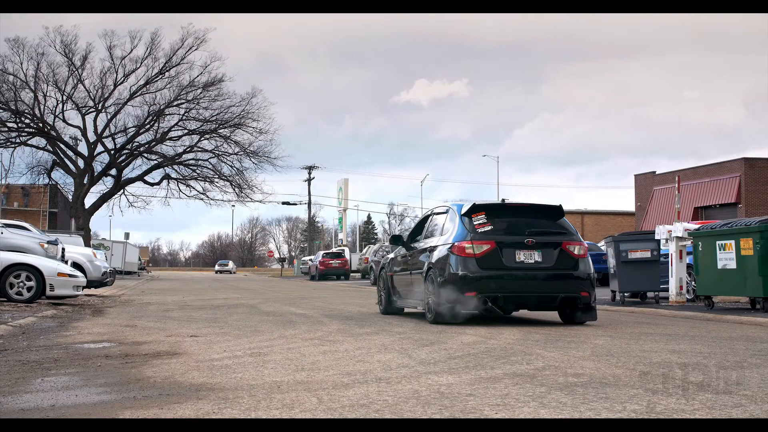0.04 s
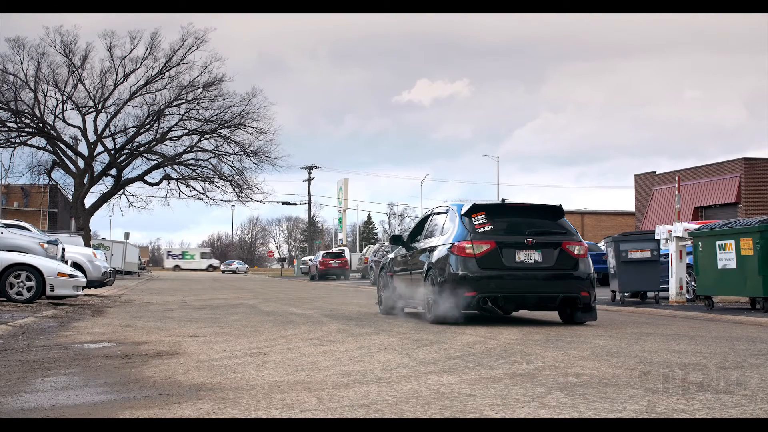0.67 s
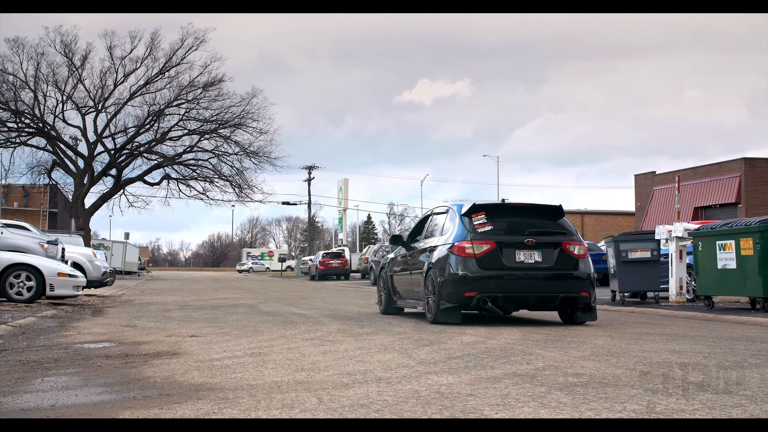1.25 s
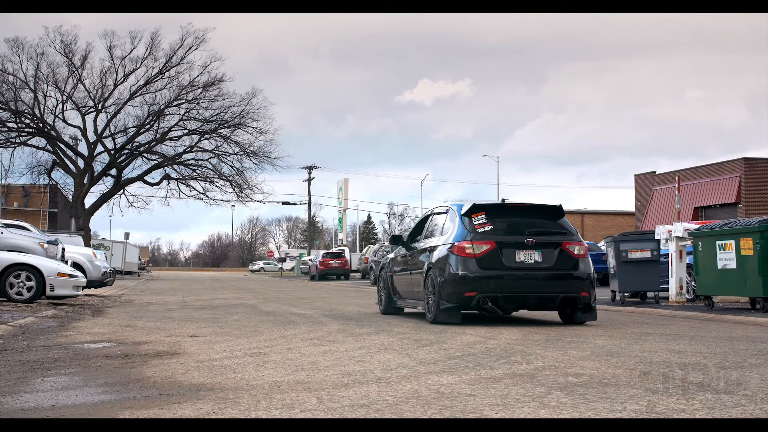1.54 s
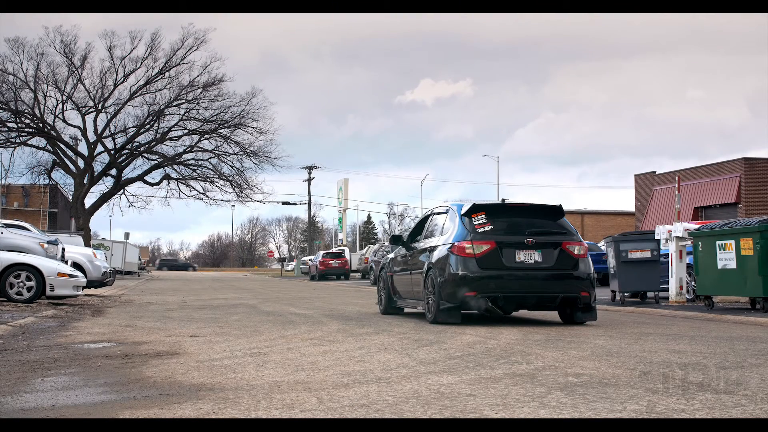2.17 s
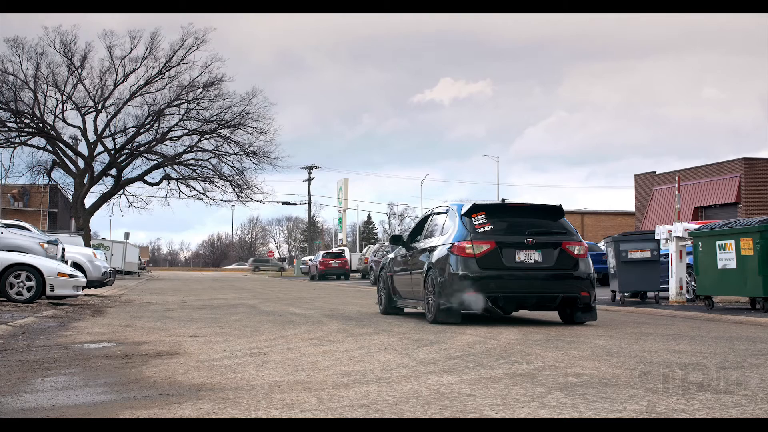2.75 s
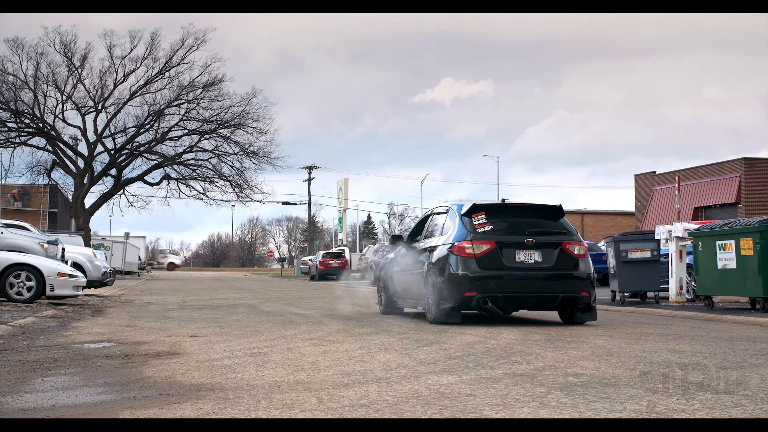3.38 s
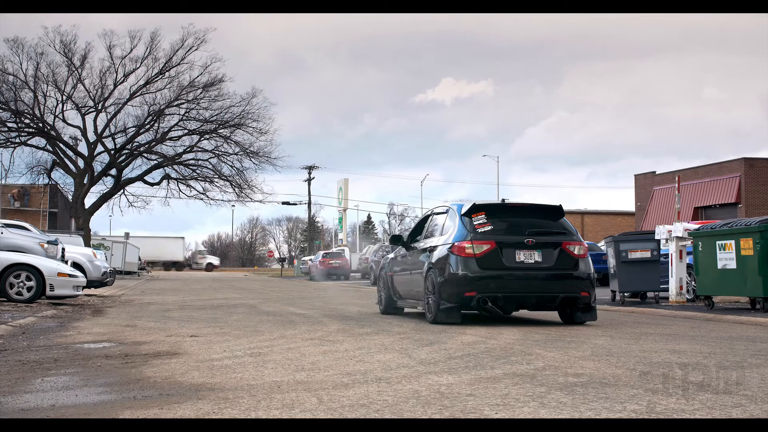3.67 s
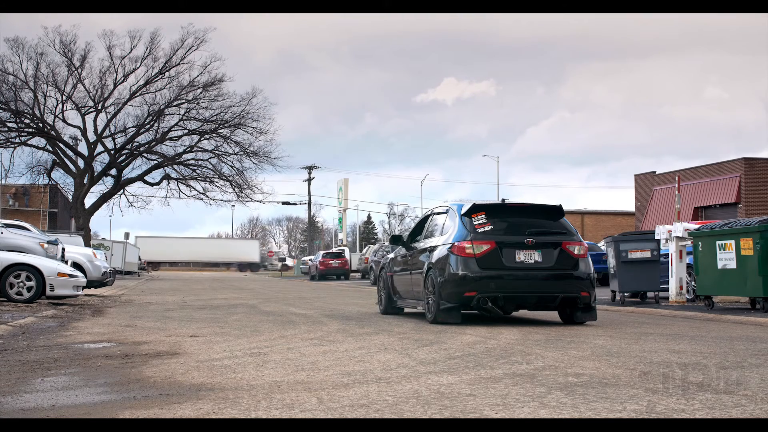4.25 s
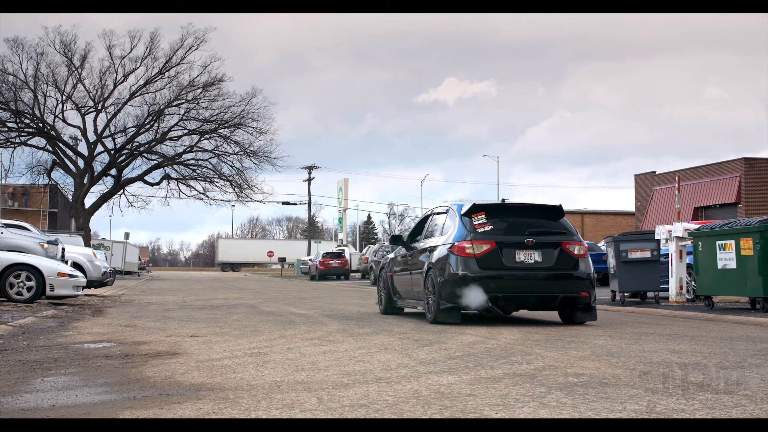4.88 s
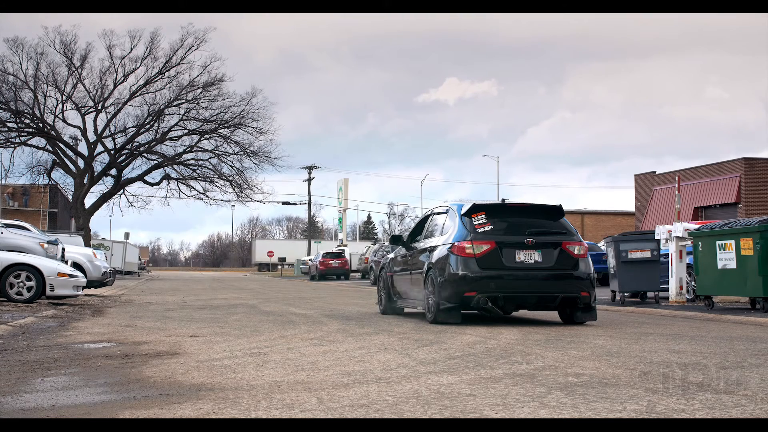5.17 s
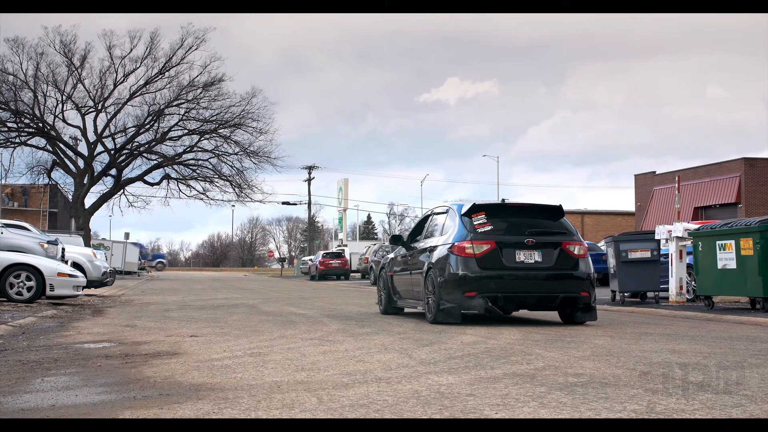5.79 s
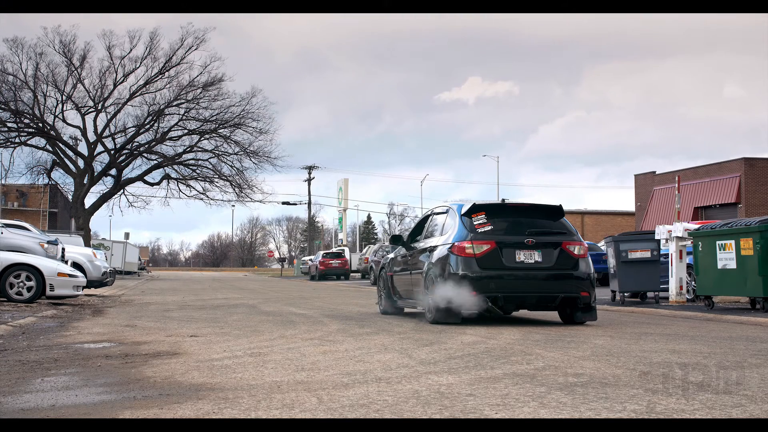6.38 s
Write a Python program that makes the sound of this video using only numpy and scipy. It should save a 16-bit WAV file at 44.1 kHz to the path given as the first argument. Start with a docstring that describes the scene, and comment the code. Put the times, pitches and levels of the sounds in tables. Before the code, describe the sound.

A parked four-cylinder car is heard from a few metres behind in an open lot, with short echoes off nearby walls. Its loud, raspy exhaust is already revving up and peaks at about 0.7 seconds. Sharp cracks follow as the revs fall, then scattered pops from 1.2 to 2.1 seconds. Soft rushing air and a faint, breathy turbo whistle sink away over a lumpy, spitting idle. At 2.7 seconds a harder rev climbs, barking and cracking, to a higher peak at 3.5. A rapid volley of loud cracks runs from 3.6 to 4.4 seconds, the hardest overloading the microphone. The whistle glides down again as the engine settles into an uneven burble, with a sharp cluster of backfires near 4.9 seconds and another pop at 5.2. Around 6.1 seconds a third rev starts with a few pops and is cut off while rising.

```python
"""Revving a loud exhaust

A parked four-cylinder car revs twice through a straight pipe in an open lot, and a third rev begins.
Uneven firings thump and rasp; the hardest ones crack, and as the revs fall fuel bangs in the pipe.
The turbo sheds its air and whistles down, buildings echo, and sharp cracks overload the microphone."""
import sys
import numpy as np
from scipy import signal
from scipy.fft import rfft, irfft, next_fast_len
from scipy.io import wavfile
from scipy.ndimage import uniform_filter1d

SR = 44100
rng = np.random.default_rng(int(sys.argv[2]) if len(sys.argv) > 2 else 0)


def output_pcm(signal):
    """Save a mono or channel-first signal as 16-bit PCM at the path in sys.argv[1].

    Samples are clipped to [-1, 1] before scaling.
    """
    pcm = np.clip(np.atleast_2d(signal).T, -1, 1) * 32767
    wavfile.write(sys.argv[1], SR, np.round(pcm).astype(np.int16))


N = 283563
TIME = np.arange(N) / SR
FRONT_LAG_S = .0003  # the steep front rides on the crest of the thump


# Loud pulses steepen down the pipe, soft ones drown in the gas: (thump level [dB], front weight [gain])
STEEPENING = [(-33.5, 0.72), (-15.5, 0.84), (-8, 2.34)]
def exhaust(times, strength, thump_db=-1, rasp_db=-2, hiss_db=-3):
    """Each pulse is a thump with a steep front, sharper when strong, and a puff of turbulent gas."""
    rate, throttle, lumpy = engine_state()
    thump_level, rasp_level, hiss_level = exhaust_levels(rate, throttle)
    push = clicks(times - FRONT_LAG_S, strength)
    front = clicks(times, strength ** 1.5)
    steepness = np.interp(20 * np.log10(thump_level), *np.transpose(STEEPENING))
    body = from_db(thump_db) * thump_level * thumps(push, rate, throttle, lumpy)
    edge = from_db(rasp_db) * rasp_level * rasp(front, steepness, throttle, lumpy)
    air = from_db(hiss_db) * hiss_level * gas_hiss(front)
    return body + surges() * (edge + air)


# Body of one exhaust pulse: (frequency [Hz], relative level [dB])
THUMP_SPECTRUM = [(25, -69), (48, -52), (72, -1), (125, 6.5), (200, 6), (300, 3), (400, -1), (540, -4),
                  (780, -14), (1200, -15), (2500, -76.5), (6000, -104)]
# How hot, fast gas recolours it: (frequency [Hz], relative level [dB])
HOT_PIPE_EQ = [(60, -7.5), (110, -13.5), (143, 3), (205, 1.5), (265, 9.5), (310, 3.5), (400, 7.5),
               (460, 1.5), (520, 7), (700, 8), (1200, 5)]
def thumps(push, rate, throttle, lumpy, rumble=.85):
    """The low blow of each pulse: clean at speed, rumbling and ringing in the pipe near idle."""
    blow = coloured(push + rumble * lumpy * puffs(push, .006), THUMP_SPECTRUM)
    # under load at speed the deepest bass fades and the tailpipe's throat sings out
    heat = throttle * np.interp(rate, [55, 95], [.35, 1])
    hot = coloured(blow, HOT_PIPE_EQ)
    blow = blow + heat * (hot * blow.std() / hot.std() - blow)
    ringing = np.interp(rate, [60, 90, 130], [1, .6, .25])  # fast flow damps the resonances
    return evened(lot_echo(blow + ringing * (pipe(blow) - blow)))


# Midrange bite of the pulse fronts: (frequency [Hz], relative level [dB])
RASP_SPECTRUM = [(60, -14), (300, 5), (600, 9.5), (800, 0.5), (1100, 5.5), (1300, 3), (1550, 6.5),
                 (2000, -1), (2800, -6), (3500, -9), (4400, -23), (6000, -65.5), (10000, -48), (16000, -74)]
def rasp(front, steepness, throttle, lumpy, grit_low_hz=620, bark_hz=(480, 1250)):
    """Steep fronts and turbulence rasp; under load each pulse also barks in the tailpipe's throat."""
    turbulence = .65 * evened(puffs(front, .003)) + (.42 + lumpy) * rng.standard_normal(N)
    grit = filtered(turbulence, 3, grit_low_hz, "high")
    buzz = evened(lot_echo(coloured(steepness * evened(front) + grit, RASP_SPECTRUM)))
    bark = filtered(steepness * front + .5 * puffs(front, .015), 2, bark_hz, "band")
    return buzz + .79 * throttle * evened(lot_echo(bark))


# Sizzle of escaping gas: (frequency [Hz], relative level [dB])
HISS_SPECTRUM = [(1500, -38.5), (3500, -7.5), (4800, -8.5), (6300, -5), (7500, -7.5), (10000, -14),
                 (12000, -23), (16000, -34)]
def gas_hiss(front, steady=.49):
    """Gas leaves the pipe in short puffs over a steady stream."""
    flow = evened(puffs(front, .003)) + steady * rng.standard_normal(N)
    return evened(coloured(flow, HISS_SPECTRUM))


def surges(depth_db=1.7, cutoff_hz=11):
    """Uneven combustion: a gain that swells and sinks at random several times a second."""
    slow = filtered(rng.standard_normal(N + SR), 2, cutoff_hz)[SR:]
    return from_db(depth_db * slow / slow.std())


# Standing waves of the pipe, mostly about 48 Hz apart: (frequency [Hz], peak gain [dB])
PIPE_MODES = [(54, 16), (125, 3), (175, 7), (216, 5.5), (264, 2.5), (310, 2.5), (359, -3), (410, 2.5),
              (459, -10.5), (510, 1), (560, 2), (612, 0)]
def pipe(x, width_hz=14, through=.62):
    """Part of the sound passes straight through the pipe and part rings at its standing waves."""
    size = next_fast_len(N + SR)
    size += size % 2
    hz = np.maximum(np.arange(size // 2 + 1) * SR / size, 1)
    ring = sum(from_db(db) / (1 + 1j * (hz / mode - mode / hz) * mode / width_hz)
               for mode, db in PIPE_MODES)
    return irfft(rfft(x, size) * (through + ring), size)[:N]


# The engine's climb, one curve per rev: (time [s], firing rate [Hz])
PULLS = [
    [(-.2, 44), (.1, 59.9), (.5, 91.5), (.7, 105.2), (.78, 106.1)],
    [(2.7, 37), (2.8, 42), (3.0, 70), (3.2, 103.3), (3.35, 122), (3.47, 133.5), (3.52, 138.3)],
    [(6.1, 37), (6.25, 47), (6.43, 66)],
]
def engine_speed(idle_hz=26, knee_hz=48, slowing_hz_per_s=54.5):
    """The firing rate climbs with each pull; friction then slows it steadily, easing off near idle."""
    rate = np.zeros(N)
    for pull in PULLS:
        top_s, top_hz = pull[-1]
        decay = np.exp(-slowing_hz_per_s * (TIME - top_s) / knee_hz)
        coast = idle_hz + knee_hz * np.arcsinh(np.sinh((top_hz - idle_hz) / knee_hz) * decay)
        rev = np.where(TIME < top_s, automation(pull)[0], coast)
        rate = np.where(TIME < pull[0][0], rate, rev)
    return rate


# The driver's foot: (press [s], lift [s], pedal depth [0-1])
PEDAL_MOVES = [(-.3, 0.698, 0.44), (2.67, 3.494, 0.99), (6.078, 6.602, 1.0)]
def engine_state(press_s=.25, release_s=.035):
    """The engine's controls: firing rate, throttle (1 while open) and lumpiness (1 near idle)."""
    rate = engine_speed()
    throttle = sum(gate(press, lift + release_s / 2, press_s, release_s)
                   for press, lift, _ in PEDAL_MOVES)
    lumpy = np.clip((66 - rate) / 20, 0, 1)
    return rate, throttle, lumpy


# Exhaust balance before trims, throttle shut: (firing rate [Hz], thump [dB], rasp [dB], hiss [dB])
COASTING_MIX = [(38, -41, -59.5, -84), (46.3, -39.5, -52.5, -79), (54.8, -27, -43.5, -73),
                (77, -21, -36.5, -62.5), (112.3, -16, -30.5, -57), (124.4, -11.5, -22, -49)]
# The same with the pedal on the floor: (firing rate [Hz], thump [dB], rasp [dB], hiss [dB])
FLOORED_MIX = [(42, -25, -24, -40), (61.6, -17, -35, -60), (86, -14, -22, -58), (129, -14, -22.5, -58)]
# Curve of the pedal's crossfade between the two: (thump [exponent], rasp [exponent], hiss [exponent])
PEDAL_CURVES = (1, 10.2, 1.6)
# Speeds at which the pipe booms under load: (firing rate [Hz], thump boost [dB])
BOOMS = [(78, 3), (100, 3.5), (131, 7.5)]
def exhaust_levels(rate, throttle, boom_width_hz=5.4, slack_after_s=.031, slack_s=.089, slack_db=-7):
    """Thump, rasp and hiss gains ride on speed and pedal, and go slack for a moment at each lift."""
    pedal, slack = np.zeros(N), 0
    for press, lift, depth in PEDAL_MOVES:
        pedal = np.where(TIME < press, pedal, depth)
        slack = slack + np.exp(-((TIME - lift - slack_after_s) / slack_s) ** 2)
    boom_db = throttle * sum(db * np.exp(-((rate - hz) / boom_width_hz) ** 2) for hz, db in BOOMS)
    layers = zip(automation(COASTING_MIX, rate), automation(FLOORED_MIX, rate), PEDAL_CURVES)
    levels = []
    for coasting_db, floored_db, power in layers:
        load = (throttle * pedal) ** power
        levels.append((1 - load) * coasting_db + load * floored_db + slack_db * slack)
    thump_db, rasp_db, hiss_db = levels
    return from_db(thump_db + boom_db), from_db(rasp_db + boom_db / 2), from_db(hiss_db)


# Cylinders in firing order; 0 and 3 share the longer header and are the louder pair off throttle:
# (coasting lag [s], coasting level [dB], loaded lag [s], loaded level [dB])
CYLINDERS = [(.0023, 0, .0013, -4), (0, -6.9, .0006, .3), (.0011, -6.2, .0005, 0), (.0022, .8, .0007, -4.5)]
def firings(rate, throttle, lumpy):
    """Times and strengths of the pulses: a strong pair and a weak pair in turn make the burble."""
    times, cylinder = crank_turns(rate)
    coast_lag, coast_db, load_lag, load_db = np.array(CYLINDERS)[cylinder].T
    load, lumpy = np.interp(times, TIME, throttle), np.interp(times, TIME, lumpy)
    lag_s = coast_lag + load * (load_lag - coast_lag)
    level_db = (1 - lumpy / 2) * (coast_db + load * (load_db - coast_db))
    jitter_s = .0001 + .0011 * lumpy
    scatter_db = .8 + .4 * load + 8.5 * lumpy
    chance = rng.standard_normal((len(times), 2))
    return times + lag_s + jitter_s * chance[:, 0], from_db(level_db + scatter_db * chance[:, 1])


# Sync points for the crank's position: (time [s], cylinder that fires [0-3])
CRANK_CUES = [(.462, 1), (.59, 1), (0.81, 0), (1.054, 0), (3.066, 2), (3.196, 2), (3.269, 2), (3.463, 2),
              (3.6246, 0), (3.9119, 0), (4.4063, 0)]
def crank_turns(rate, count=4):
    """The crank gives each cylinder its turn: when it comes, and whose it is."""
    cycles = np.cumsum(rate) / SR / count
    cue_s, cylinder = np.transpose(CRANK_CUES)
    cue_s = cue_s - np.array(CYLINDERS)[cylinder.astype(int), 0]
    offset = np.interp(cue_s, TIME, cycles) - cylinder / count
    slip = np.unwrap(2 * np.pi * offset) / (2 * np.pi)
    fired = (cycles - np.interp(TIME, cue_s, slip)) * count
    number = np.arange(np.ceil(fired[0]), fired[-1]).astype(int)
    return np.interp(number, fired, TIME), number % count


# Hard firings, under load and as the revs fall: (time [s], front drive [dB], thump level [dB])
CRACKS = [(0.375, -13, -14), (0.462, -15, -14), (0.549, -21, -18), (0.59, -40, -16), (0.81, -7, -23.5),
          (0.849, -4, -8), (0.888, -11, -12), (0.928, -7, -20), (0.97, -16, -35), (1.012, -14, -39),
          (1.054, -11, -38), (1.236, -16, -18), (1.334, -32, -18), (1.385, -26, -16.5), (3.029, -25, -18),
          (3.054, -18, -11.5), (3.066, -17, -10.5), (3.102, -12, -22.5), (3.146, -13, -3),
          (3.156, -11, -22), (3.186, -4, -7.5), (3.196, -1, -3), (3.205, 5, -9), (3.269, 4.5, -12),
          (3.305, -14, -18), (3.32, -2, -2.5), (3.353, -4, -16), (3.416, -12, -7), (3.461, -6, -16.5),
          (3.625, 7.5, -43), (3.655, 9, -25), (3.686, 9, -36), (3.717, 9, -22), (3.748, 9.5, -9),
          (3.78, 8, -28), (3.812, 8.5, -22), (3.845, 8.5, -21.5), (3.878, 7, -28), (3.912, 3, -17),
          (3.946, -1.5, -31), (3.981, -2.5, -16), (4.053, -1, -29), (4.089, -1.5, -21), (4.127, -2, -15),
          (4.165, -2, -20), (4.203, -3, -12), (4.243, -1.5, -11.5), (4.283, -18, -9.5), (4.324, -3, -9),
          (4.364, -26, -10), (4.406, -11, -21)]
def cracks(firing_times, neighbour_front_db=-12, neighbour_thump_db=-6, low_cut_hz=140):
    """The firing nearest each cue cracks, with a shock on top and a harder thump."""
    cue_s, front_db, thump_db = np.transpose(CRACKS)
    nearest = np.abs(firing_times - cue_s[:, None]).argmin(axis=1)
    # off throttle the firing before a crack snaps too, more softly
    _, throttle, _ = engine_state()
    shut = np.interp(cue_s, TIME, throttle) < .5
    times = np.r_[firing_times[nearest], firing_times[nearest[shut] - 1]]
    front_db = np.r_[front_db, front_db[shut] + neighbour_front_db]
    thump_db = np.r_[thump_db, thump_db[shut] + neighbour_thump_db]
    thump = coloured(clicks(times - FRONT_LAG_S, from_db(thump_db)), THUMP_SPECTRUM)
    snap = shock_fronts(times, front_db, edge_db=-6.5, shock_db=-16.5,
                        grit=.4, grit_s=.012, grit_low_hz=890)
    return lot_echo(filtered(thump, 2, low_cut_hz, "high") + snap)


# Fuel going off in the pipe: (time [s], front drive [dB], thump level [dB])
BACKFIRES = [(1.4236, -16, -13), (1.661, -19.5, -23), (1.8688, -34, -12.5), (2.105, -37, -20.5),
             (2.7478, -32, -24), (2.8283, -21.5, -29.5), (2.945, -16.5, -22), (4.91, -14.5, -8),
             (4.9194, -1, -41), (4.9367, 1, -17), (4.95, -10, -37), (5.2116, -14, -10.5),
             (6.1267, -37, -27), (6.2452, -14.5, -19), (6.2908, -15, -13.5)]
def backfires(burn_s=.045, low_cut_hz=125):
    """A shock, with a thump and a short roar of burning gas that ring in the pipe."""
    times, front_db, thump_db = np.transpose(BACKFIRES)
    push = clicks(times - FRONT_LAG_S, from_db(thump_db))
    boom = pipe(coloured(push + puffs(push, burn_s), THUMP_SPECTRUM))
    snap = shock_fronts(times, front_db, edge_db=2, shock_db=-4, grit=1, grit_s=.0044, grit_low_hz=250)
    return lot_echo(filtered(boom, 2, low_cut_hz, "high") + snap)


# Thin, bright snap of a shock wave: (frequency [Hz], relative level [dB])
SHOCK_SPECTRUM = [(100, -22.5), (600, -14), (1500, 29.5), (3400, 20.5), (4400, 4.5), (6000, 6), (8500, -1),
                  (11000, -18), (16000, -22)]
def shock_fronts(times, drive_db, edge_db, shock_db, grit, grit_s, grit_low_hz):
    """A pop's sharp edge and gritty wake: the harder it is, the more of it steepens into a shock."""
    front = clicks(times, from_db(drive_db))
    wake = filtered(puffs(front, grit_s), 2, grit_low_hz, "high")
    edge = coloured(front + grit * wake, RASP_SPECTRUM)
    shock = coloured(clicks(times, from_db(drive_db) ** 2.48), SHOCK_SPECTRUM)
    return from_db(edge_db) * edge + from_db(shock_db) * shock


# Small splutters in the pipe: (time [s], relative level [dB])
SPITS = [(1.684, -49), (1.771, -43), (1.81, -50), (1.905, -45), (1.945, -46), (2.01, -42), (2.089, -48),
         (2.155, -55), (2.237, -58), (2.341, -50), (2.424, -51), (2.633, -51.5), (5.267, -47), (5.355, -49),
         (5.428, -44), (5.503, -45), (6.127, -47), (6.166, -37)]
def spits(decay_s=.0075, rush_db=8):
    """At low revs the mixture burns unevenly and the pipe spits."""
    times, db = np.transpose(SPITS)
    spit = puffs(clicks(times, from_db(db)), decay_s)
    return lot_echo(coloured(spit, HISS_SPECTRUM) + from_db(rush_db) * coloured(spit, RUSH_SPECTRUM))


# Swells of air through the turbo: (time [s], level [dB])
RUSH_LEVEL = [(0.74, -53), (0.82, -43.5), (1.15, -41), (1.52, -46.5), (1.64, -57), (1.72, -46.5),
              (2.1, -63), (2.4, -63.5), (2.76, -60.5), (2.88, -41.5), (3.5, -57), (3.95, -52), (4.6, -51),
              (5.1, -51.5), (5.6, -54.5), (6.15, -76.5), (6.24, -46), (6.43, -46)]
# Breathy colour of rushing air: (frequency [Hz], relative level [dB])
RUSH_SPECTRUM = [(500, -28), (1500, 8.5), (2200, 11), (2900, 8), (3600, 7), (4200, -18), (5200, -25.5),
                 (6400, -18.5), (7500, -27.5), (10000, -25.5), (16000, -69)]
def air_rush(flutter=.4):
    """Air is gulped as the throttle opens and escapes once it shuts, fluttering with each crank turn."""
    air = coloured(rng.standard_normal(N), RUSH_SPECTRUM)
    throb = 1 + flutter * np.cos(np.pi * np.cumsum(engine_speed()) / SR)
    return from_db(automation(RUSH_LEVEL)[0]) * throb * air / air.std()


# The turbo's glide after each full rev: (time [s], pitch [Hz], level [dB])
RUN_DOWNS = [
    [(1.0, 5120, -76), (1.45, 4130, -62), (1.75, 3100, -63), (2.05, 2520, -50), (2.4, 2274, -54.5),
     (2.8, 2360, -56), (3.1, 2840, -68)],
    [(4.1, 5670, -61), (4.7, 4550, -56), (5.03, 4180, -56), (5.25, 3610, -56), (5.5, 3300, -57),
     (5.8, 2945, -61.5), (6.1, 2690, -68.5), (6.4, 2800, -72)],
]
def turbo_whistle(throb_depth=.65, pure_tone=.15, width_hz=260, top_cut_hz=4250):
    """A breathy whistle sinks as the turbo slows and throbs with the firings."""
    whistle = 0
    for run_down in RUN_DOWNS:
        hz, db = automation(run_down)
        waver = filtered(rng.standard_normal((2, N)), 2, width_hz)
        waver = waver / waver.std()
        carrier = np.exp(2j * np.pi * np.cumsum(hz) / SR)
        tone = np.real((pure_tone + waver[0] + 1j * waver[1]) * carrier)
        fade = gate(run_down[0][0], run_down[-1][0], rise_s=.1, fall_s=.091)
        whistle = whistle + fade * from_db(db) * tone / tone.std()
    throb = 1 + throb_depth * np.cos(2 * np.pi * np.cumsum(engine_speed()) / SR)
    return filtered(whistle * throb, 6, top_cut_hz)  # the whistle dulls at its highest pitches


# Dark colour of the machinery: (frequency [Hz], relative level [dB])
ENGINE_BAY_SPECTRUM = [(30, -20.5), (80, 9.5), (130, 18.5), (400, -4.5), (800, -9.5), (1200, -5.5),
                       (1550, -12.5), (1900, -13), (2700, -31), (3600, -29), (4500, -45.5), (7000, -54.5),
                       (16000, -68)]
# Its rise and fall: (time [s], level [dB])
ENGINE_BAY_LEVEL = [(0, -33), (2.1, -42.5), (2.65, -38.5), (5.3, -48), (5.7, -42), (6.05, -48.5),
                    (6.25, -30.5)]
def engine_bay():
    """A low bed of mechanical noise from under the bonnet."""
    noise = coloured(rng.standard_normal(N), ENGINE_BAY_SPECTRUM)
    return from_db(automation(ENGINE_BAY_LEVEL)[0]) * noise / noise.std()


# An inverted reflection from the pipe's open end, then slaps from nearby walls:
# (delay [s], pressure [signed gain])
ECHOES = [(0.0116, -.16), (.033, .25), (0.058, .13), (0.093, .04)]
def lot_echo(x, t60_s=.55, scatter_db=-16, build_s=.024, dull_hz=2200):
    """Direct sound, a few dull echoes and a thin scatter from parked cars and walls."""
    t = TIME[:SR]
    tail = rng.standard_normal(SR) * from_db(-60 * t / t60_s) * np.minimum(t / build_s, 1)
    tail *= from_db(scatter_db) / np.sqrt(np.sum(tail ** 2))
    for delay, share in ECHOES:
        tail[int(delay * SR)] += share
    return x + signal.oaconvolve(x, filtered(tail, 1, dull_hz))[:N]


def clicks(times, heights):
    """One-sample pushes at the given times."""
    samples = np.clip(np.round(times * SR).astype(int), 0, N)
    return np.bincount(samples, heights, N + 1)[:N]


def puffs(pushes, decay_s):
    """A burst of turbulence dies away after each push, with as much energy as the push."""
    pole = np.exp(-1 / (decay_s * SR))
    envelope = signal.lfilter([np.sqrt(1 - pole * pole)], [1, -pole], pushes + 1e-18)
    return envelope * rng.standard_normal(N)


def coloured(x, spectrum, size=4096):
    """Shapes a sound with a spectrum's minimum-phase impulse response, scaled to peak 1."""
    hz, db = np.transpose(spectrum)
    grid = np.maximum(np.arange(size // 2 + 1) * SR / size, 1)
    gain = from_db(np.interp(np.log(grid), np.log(hz), db))
    cepstrum = irfft(np.log(gain))
    cepstrum[1:size // 2] *= 2
    cepstrum[size // 2 + 1:] = 0
    impulse = irfft(np.exp(rfft(cepstrum)))
    return signal.oaconvolve(x, impulse / np.abs(impulse).max())[:N]


def filtered(x, order, hz, kind="low"):
    """A low-, high- or band-pass filter."""
    return signal.sosfilt(signal.butter(order, hz, kind, fs=SR, output="sos"), x)


def evened(x, window_s=.031):
    """Holds the running rms at 1 and leaves the single pulses standing."""
    size = int(window_s * SR / 2)
    power = uniform_filter1d(uniform_filter1d(x * x, size), size)
    return x / np.sqrt(np.abs(power) + 1e-14)


def automation(rows, along=TIME):
    """One curve per value column of a breakpoint table, read along time or another control."""
    points, *columns = np.transpose(rows)
    return [np.interp(along, points, column) for column in columns]


def gate(start, end, rise_s, fall_s):
    """Rises from 0 to 1 after the start and is back at 0 by the end."""
    return np.clip(np.minimum((TIME - start) / rise_s, (end - TIME) / fall_s), 0, 1)


def from_db(db):
    """Decibels to gain."""
    return 10 ** (np.asarray(db) / 20)


def scene():
    """The car in mono, heard from a few metres behind."""
    times, strength = firings(*engine_state())
    tailpipe = exhaust(times, strength) + cracks(times) + backfires() + spits()
    return (tailpipe + air_rush() + turbo_whistle() + engine_bay())[None]


def record(dry, cutoff_hz=17000):
    """The microphone soft-clips at full scale, and the very top is cut."""
    clipped = dry / (1 + dry ** 8) ** (1 / 8)
    return signal.sosfilt(signal.cheby2(14, 70, cutoff_hz, fs=SR, output="sos"), clipped)


dry = scene()
out = record(dry)
output_pcm(out)
```